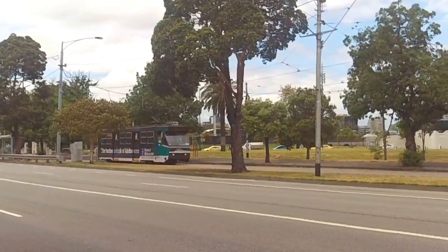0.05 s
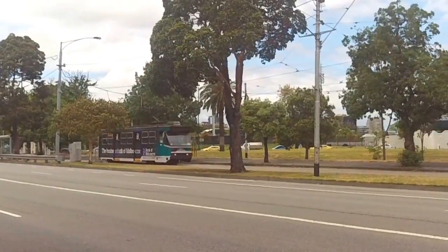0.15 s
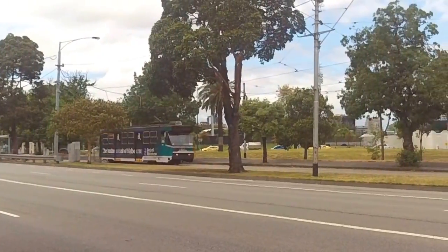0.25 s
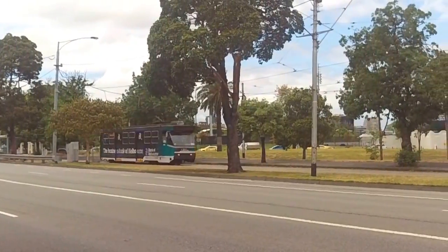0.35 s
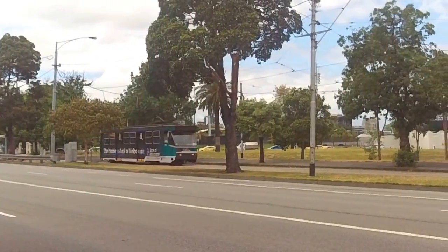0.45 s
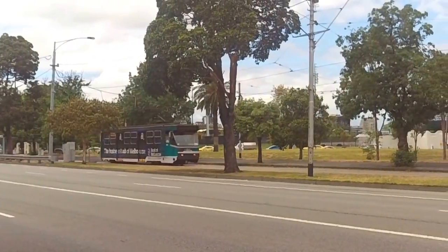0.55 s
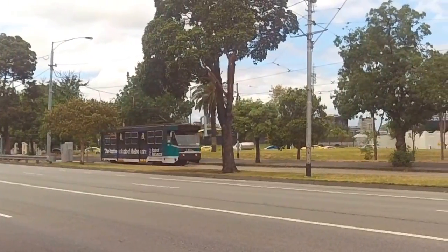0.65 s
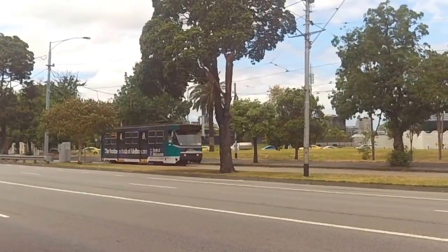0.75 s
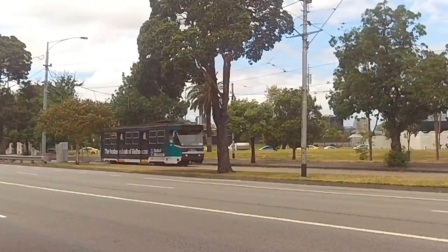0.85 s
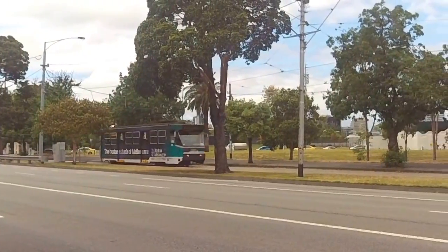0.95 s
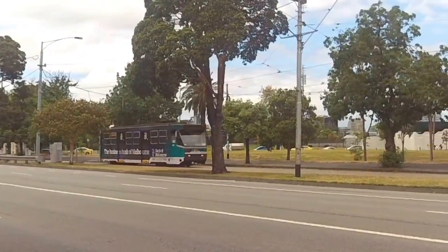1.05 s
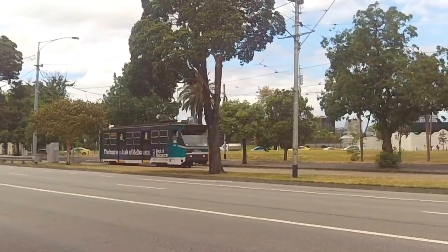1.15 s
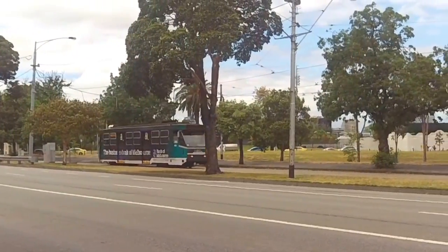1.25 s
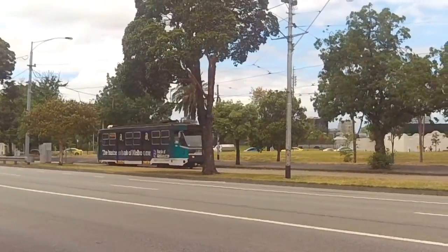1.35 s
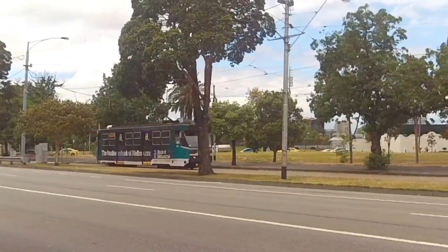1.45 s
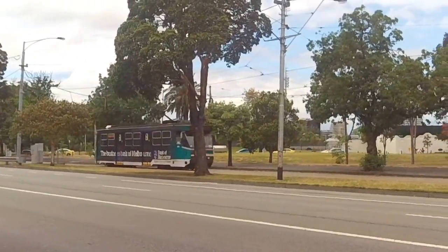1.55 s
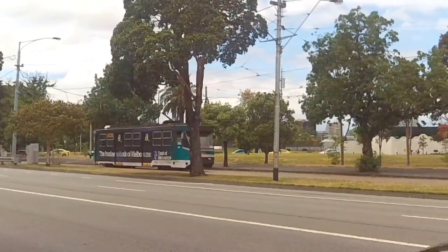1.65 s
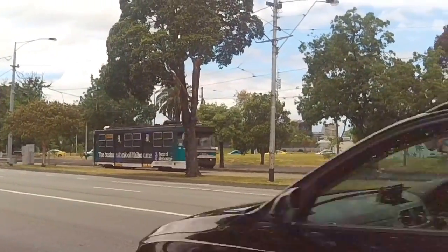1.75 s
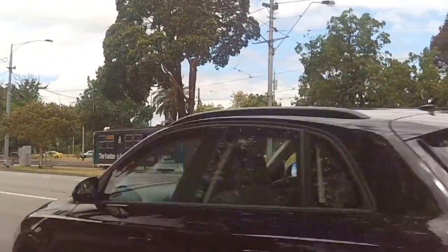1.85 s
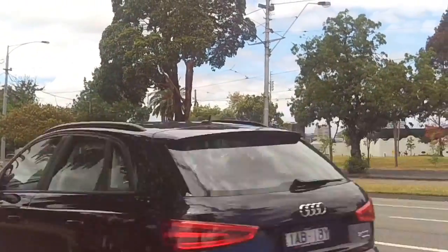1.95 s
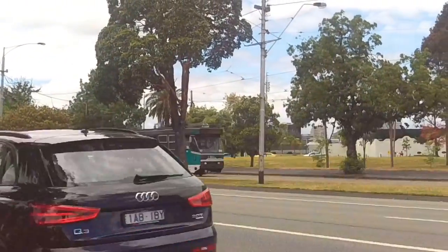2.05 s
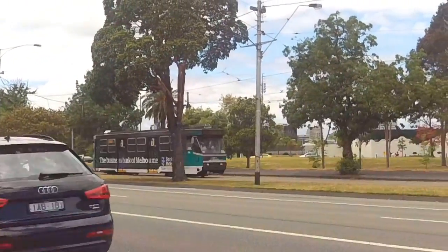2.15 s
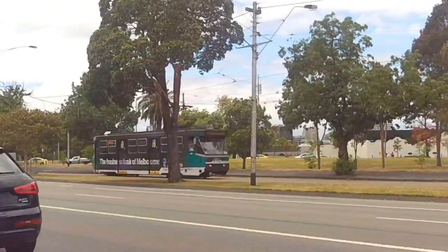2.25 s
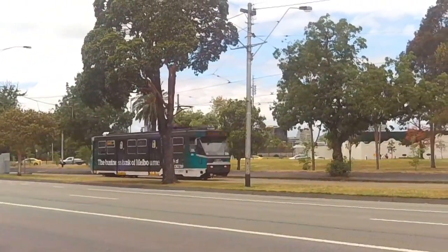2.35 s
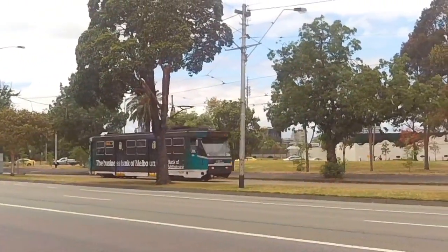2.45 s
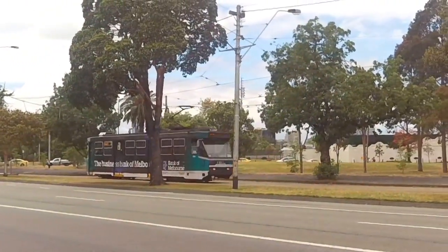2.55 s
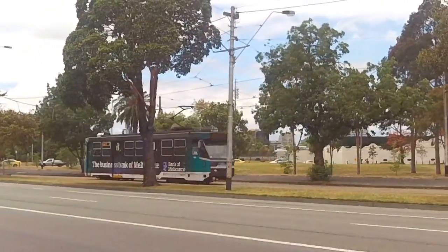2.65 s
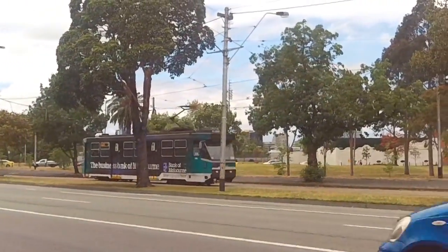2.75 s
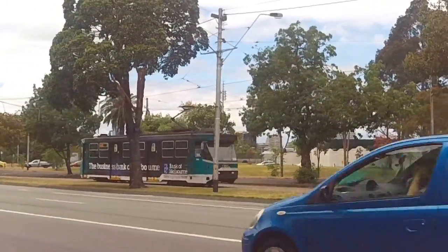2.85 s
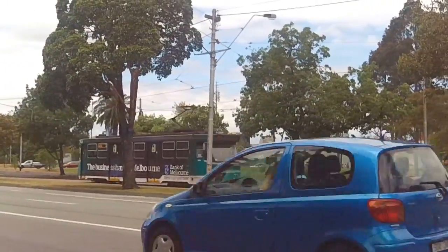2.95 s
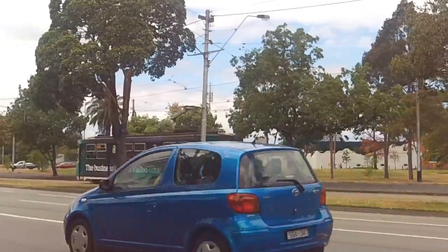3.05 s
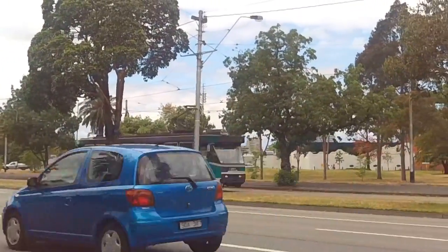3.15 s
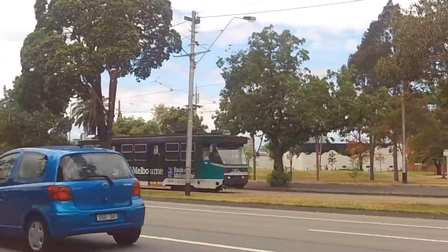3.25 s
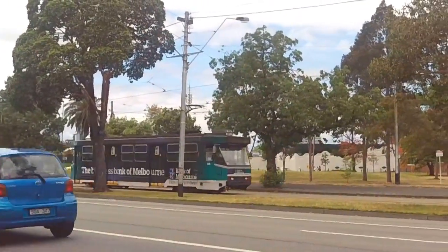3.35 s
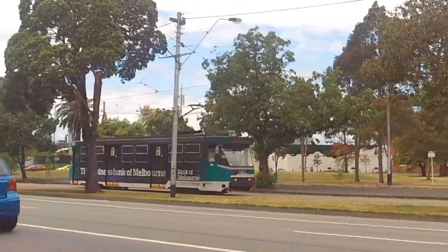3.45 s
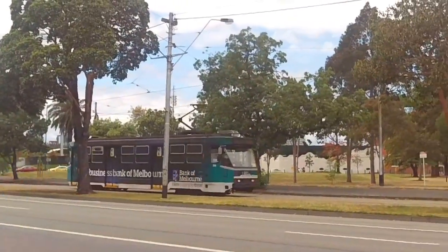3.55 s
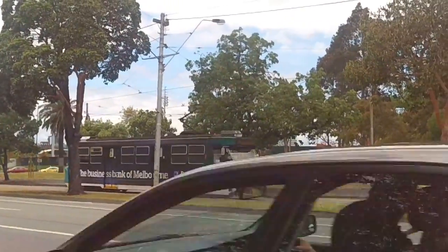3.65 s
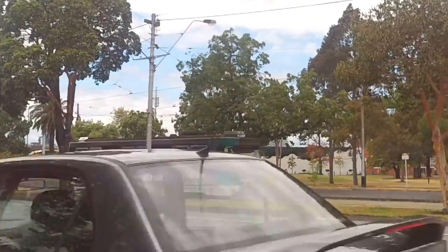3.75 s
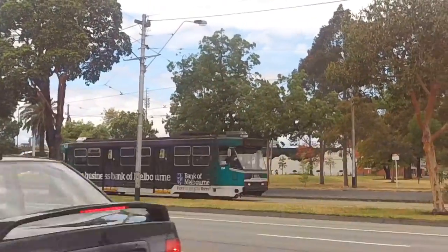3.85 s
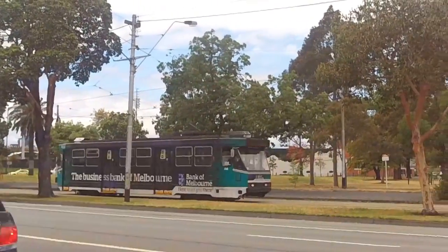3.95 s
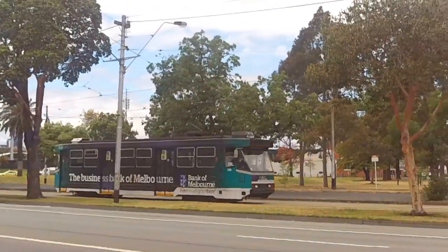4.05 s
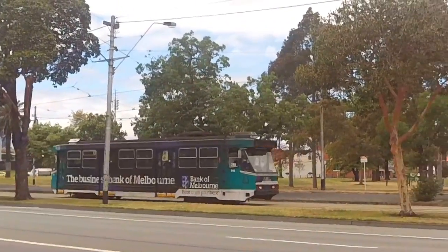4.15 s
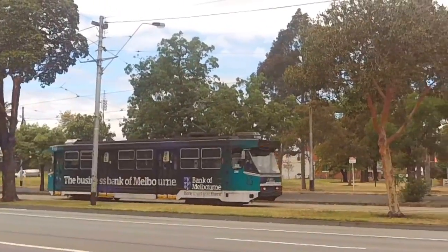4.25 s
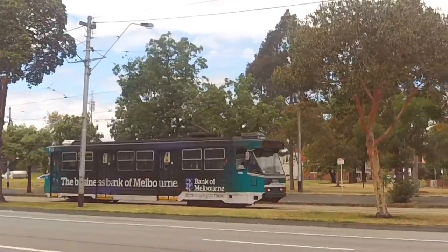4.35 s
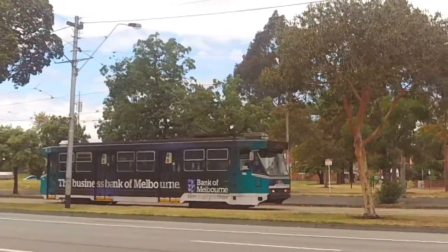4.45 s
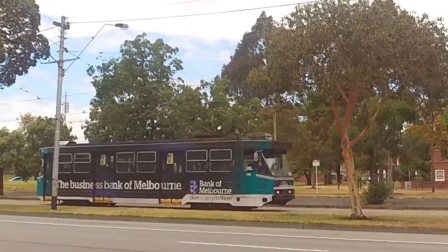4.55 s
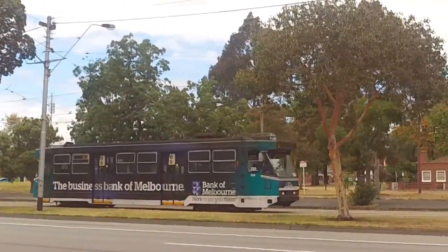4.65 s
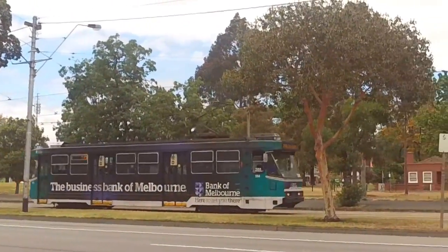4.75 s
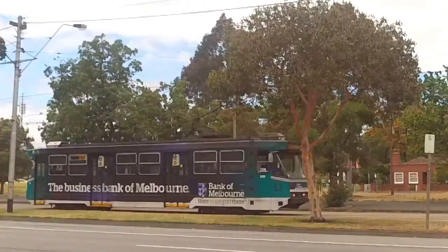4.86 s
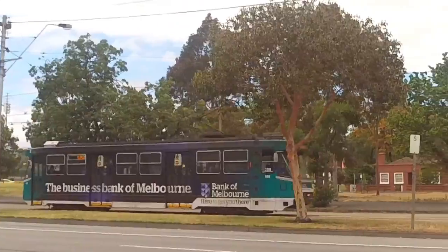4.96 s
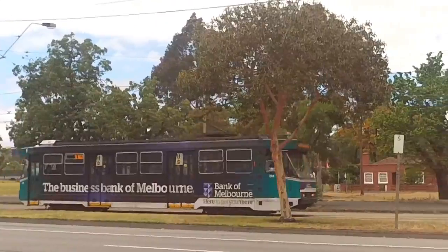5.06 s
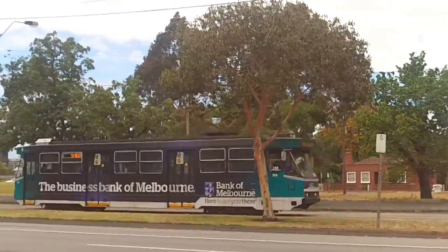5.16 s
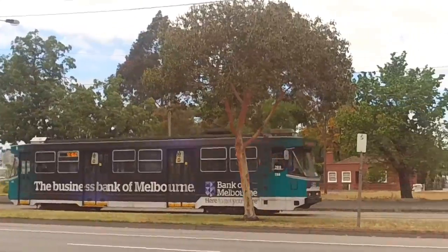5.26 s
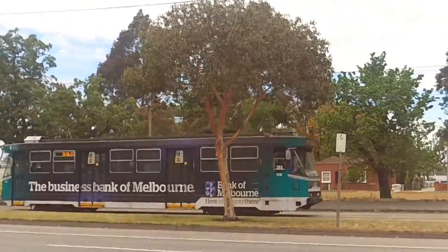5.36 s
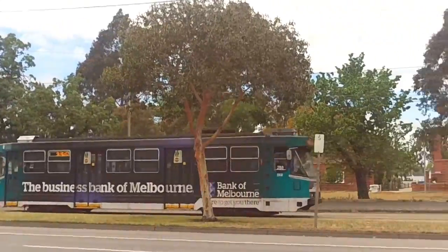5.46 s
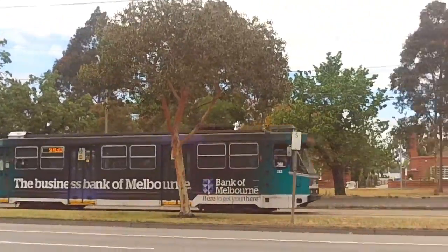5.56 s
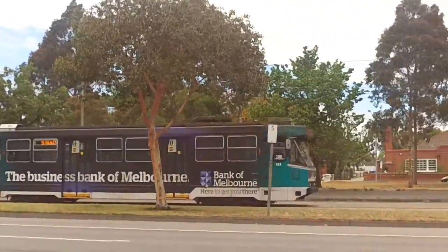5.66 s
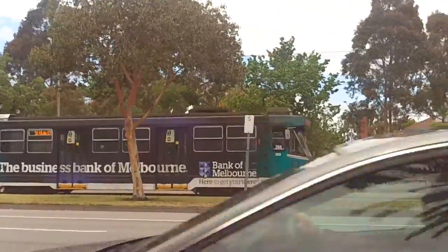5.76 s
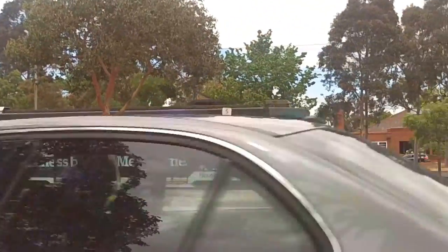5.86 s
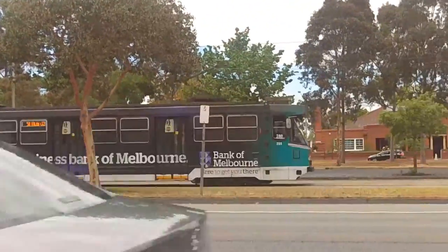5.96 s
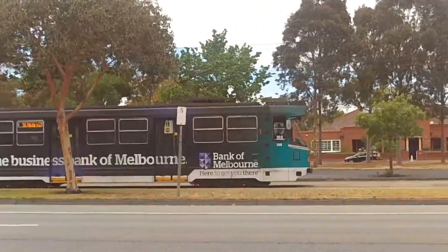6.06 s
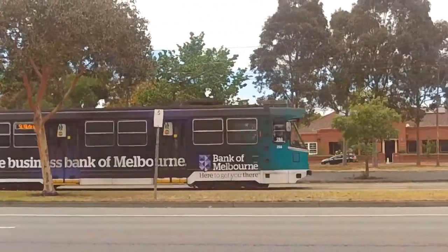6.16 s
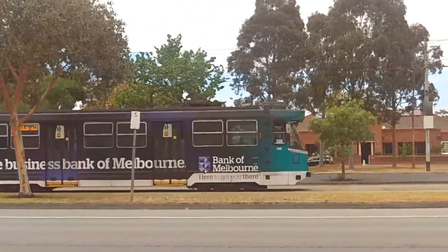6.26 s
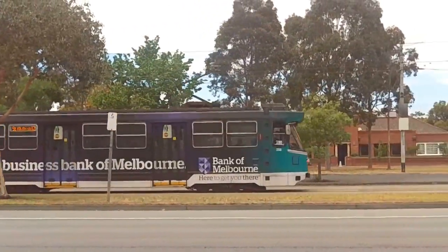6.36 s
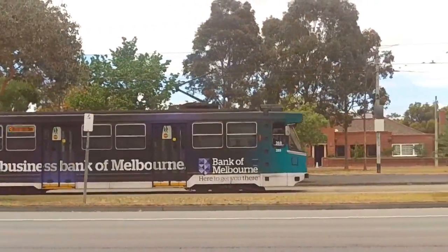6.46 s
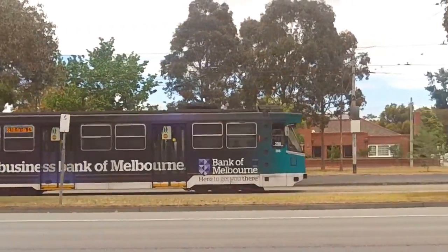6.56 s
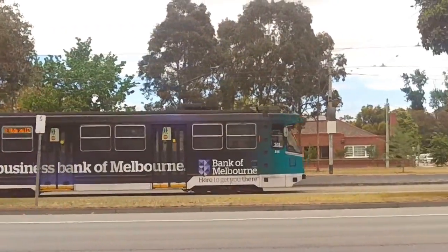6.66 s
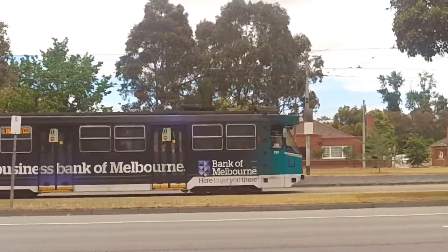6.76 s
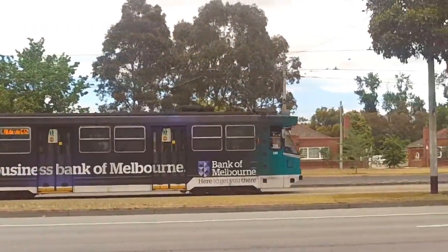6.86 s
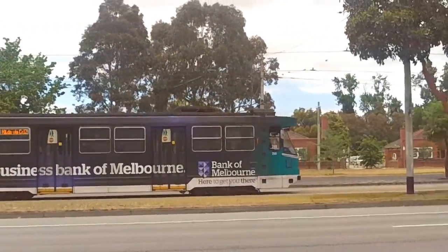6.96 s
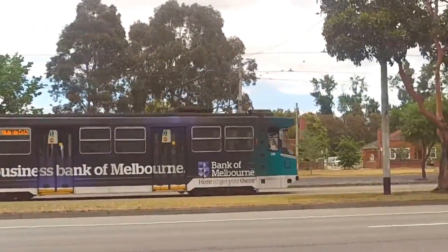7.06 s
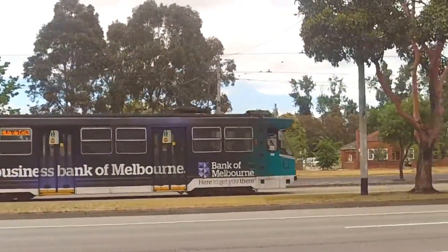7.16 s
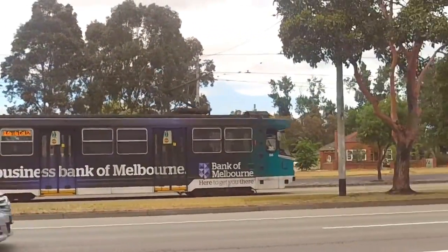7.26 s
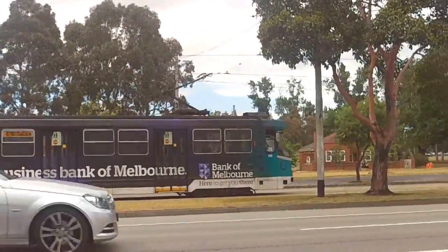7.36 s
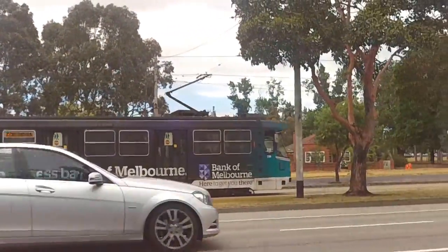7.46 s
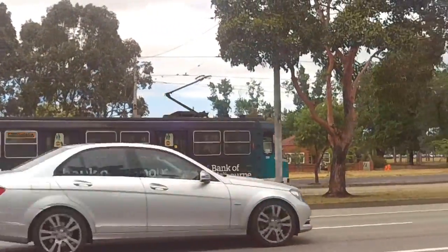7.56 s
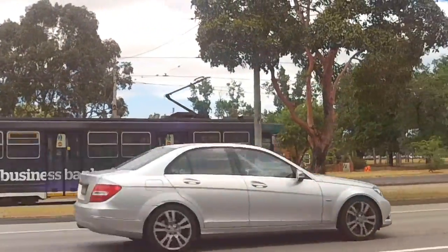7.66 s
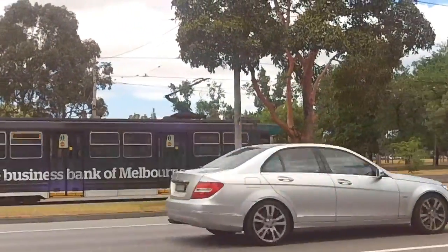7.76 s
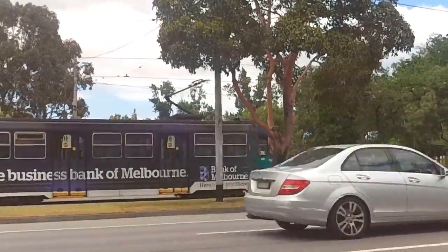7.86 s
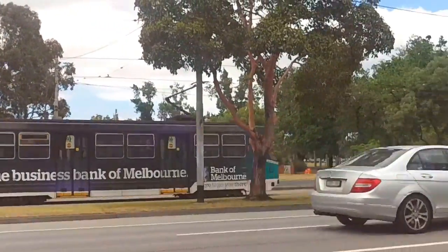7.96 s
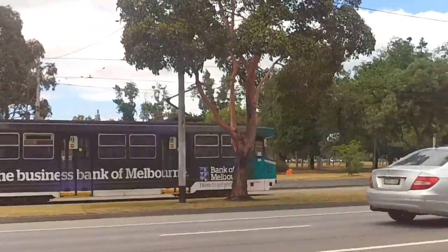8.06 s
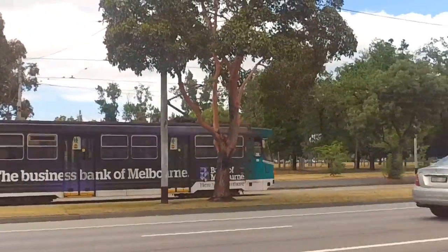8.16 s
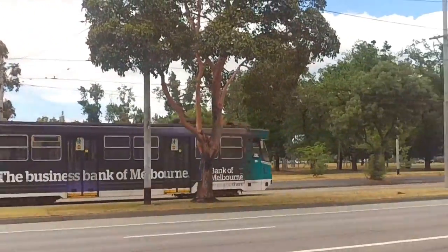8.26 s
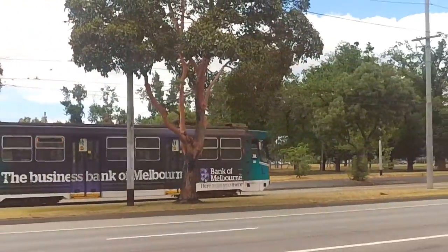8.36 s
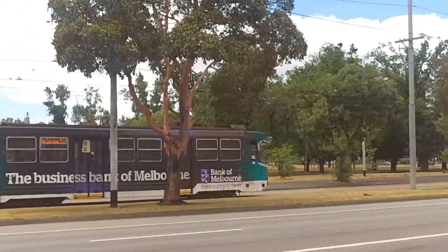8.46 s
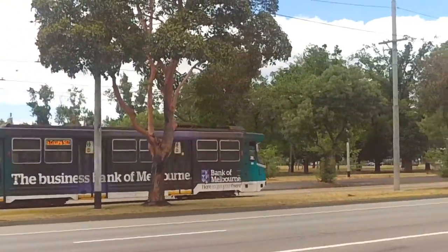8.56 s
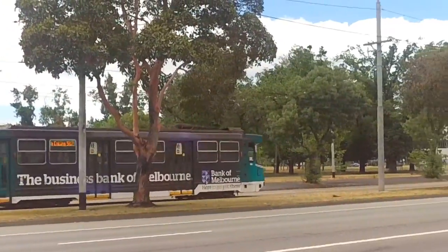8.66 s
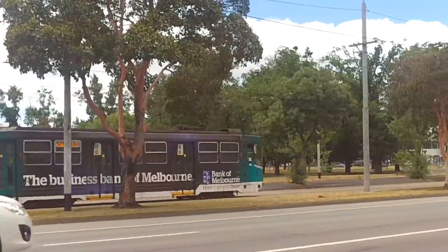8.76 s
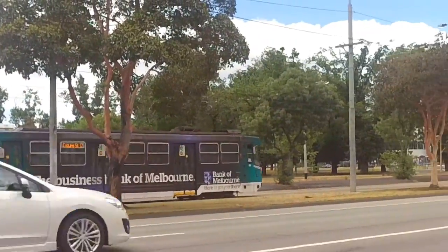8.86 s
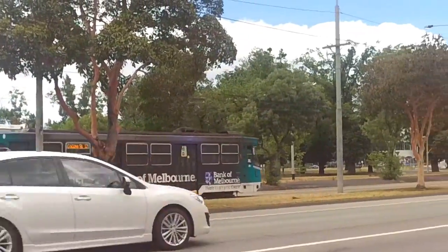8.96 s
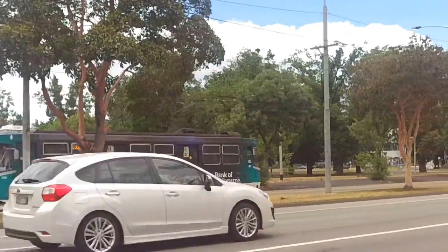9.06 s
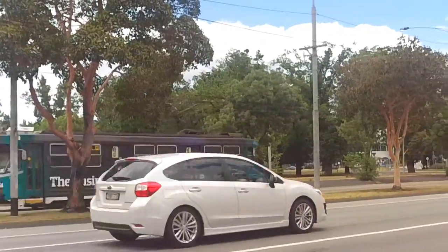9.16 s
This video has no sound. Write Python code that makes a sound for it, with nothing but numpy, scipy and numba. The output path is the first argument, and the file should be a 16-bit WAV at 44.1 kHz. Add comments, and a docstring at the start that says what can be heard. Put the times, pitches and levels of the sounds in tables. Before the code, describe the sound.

Open roadside, small stereo microphone at the kerb. It begins fairly quiet: distant traffic wash, a faint mid-low motor hum gone by about 1 second, a tiny bird twitter at 0.15 and a barely audible grit tick. Tyre roar climbs strongly from 1 second; a car passes left to right at about 2, another at 3.1, and a closer one at 3.75 with more engine rumble. The roar stays dense and fluttering, with hollow, sliding colours and airy hiss. A sharp little grit click comes at 4.6. The closest car sweeps past at 5.9, deep and broad, with a short wind thump at 5.8 that momentarily ducks the sound. Around 6.7 the rush is darker and smoother. Farther cars pass right to left at 7.7 and, faster, 9.05, with small wind bumps near 8 and thin high bird chirps from 8.1 to 8.7. It ends mid-rush.

```python
"""Cars roll past a few metres from a two-port microphone at the kerb; far traffic fills the gaps.
Each axle is noise read with its own lag at each port; bands of it make roar, tread, hiss, sizzle and rumble.
Slipstream puffs push the ports and make the gain control duck; grit ticks twice.
Behind: a small bird (gliding sines with tree echoes) and a distant motor (one sine)."""
import sys
import numpy as np
from scipy import signal
from scipy.fft import rfft, irfft, next_fast_len
from scipy.io import wavfile
from scipy.ndimage import uniform_filter1d
from numba import njit

SR = 44100
rng = np.random.default_rng(int(sys.argv[2]) if len(sys.argv) > 2 else 0)


def transcribe(signal):
    """Save signal, clipped to [-1, 1], as a 16-bit WAV file at the path in sys.argv[1]."""
    frames = np.atleast_2d(signal).T
    limited = np.clip(frames, -1, 1)
    pcm = np.round(limited * 32767).astype(np.int16)
    wavfile.write(sys.argv[1], SR, pcm)


N = 406161

# cars: t abreast/s, lane distance/m, speed toward right port/(m/s), relative strength/dB,
# extra hiss weight/dB, roar f/Hz, sizzle peak level/dB, engine peak over roar/dB
CAR_PASSES = [(1.95, 5.9, 12, 2, -5.5, 870, -48, -21.5), (3.101, 4.9, 10, 1, -9, 960, -39, -26),
              (3.75, 4, 11.5, 2.5, -8.5, 1106, -45, -15), (5.901, 2.53, 11.5, 3, -4, 973, -42, -10.5),
              (7.7, 8.8, -11.5, 2, 2, 978, -45.5, -23), (9.05, 7.6, -18, 1, -2, 1000, -48.5, -18.5)]
# far traffic: direction as a sine (-1 right, 1 left), relative strength/dB
FAR_STREAMS = [(-0.12, -23), (-1.07, -24), (0.94, -25.5), (-0.89, -20.5)]
WHEELBASE_M = 1.3


def sources(t):
    """Direction sine, gain and hiss gain per axle and far stream; axle gain falls as 1 / distance."""
    for abreast_s, lane_m, speed, db, hiss_db, *_ in CAR_PASSES:
        for axle in (-.5, .5):
            along_m = speed * (abreast_s - t) + axle * WHEELBASE_M
            r = np.hypot(along_m, lane_m)
            yield along_m / r, undb(db) / r, undb(db + hiss_db) / r
    for side, db in FAR_STREAMS:
        yield side + 0 * t, undb(db), undb(db)


def traffic(t, fine, order, port_lag_s, shade_db, airy):
    """Raw rush of all tyres at both ports: nearness sets each share, direction the lag and shading."""
    rush, power = np.zeros((2, N)), 0
    for k, (side, gain, hiss_gain) in enumerate(sources(t)):
        # each source and layer starts at its own place in the noise
        start = 1. * (3 * k + order) * (N // 60)
        lag = side * port_lag_s * SR / 2
        gain = hiss_gain if airy else gain
        shade = undb(side * shade_db / 2)
        left = shade * read(fine, start, -lag)
        right = read(fine, start, lag) / shade
        rush += gain * np.array([left, right])
        power = power + gain ** 2
    return rush / np.sqrt(power)


FAR_ROAR_HZ, FAR_SIZZLE_DB, FAR_ENGINE_DB = 940, -61, -24
# amplitude falls as distance ** -fall
SIZZLE_FALL, SIZZLE_LEAD_S, ENGINE_FALL, ENGINE_LEAD_S = 1.6, .08, 0.93, 0.16


def passing(t):
    """Power-weighted Doppler-shifted roar pitch; sizzle and engine gains peaking just before abreast."""
    weight = np.sum(undb(np.array(FAR_STREAMS)[:, 1]) ** 2)
    pitch = weight * FAR_ROAR_HZ
    sizzle, engine = undb(FAR_SIZZLE_DB) ** 2, undb(FAR_ENGINE_DB) ** 2
    for abreast_s, lane_m, speed, db, _, roar_hz, sizzle_db, engine_db in CAR_PASSES:
        r = np.hypot(speed * (abreast_s - t), lane_m)
        share = (undb(db) / r) ** 2
        doppler = 1 + speed ** 2 * (abreast_s - t) / r / 343
        weight = weight + share
        pitch = pitch + share * roar_hz * doppler

        def near(lead_s, fall):
            """Power against distance along the road, 1 at the peak."""
            return (1 + (speed * (abreast_s - lead_s - t) / lane_m) ** 2) ** -fall

        sizzle = sizzle + undb(sizzle_db) ** 2 * near(SIZZLE_LEAD_S, SIZZLE_FALL)
        engine = engine + undb(engine_db) ** 2 * near(ENGINE_LEAD_S, ENGINE_FALL)
    return pitch / weight, np.sqrt(sizzle), np.sqrt(engine)


# layer levels: t/s, roar level/dB, tread ring over roar/dB, hiss over roar/dB
ROAD_LEVELS = [(0, -29.5, -3.5, -18), (.25, -27.5, -5.5, -15), (.5, -25, -8.5, -19.5), (.7, -23, -10, -23),
               (.9, -22, -9.5, -23), (1.1, -17.5, -10.5, -24.5), (1.22, -18, -8.5, -23),
               (1.35, -17.5, -7, -21), (1.46, -14.5, -5.5, -23), (1.6, -12, -8.5, -22.5),
               (1.85, -12, -3, -15.5), (1.97, -17, -3, -20.5), (2.1, -16, -5, -19.5),
               (2.2, -15.5, -4.5, -15.5), (2.33, -16.5, -8, -16.5), (2.5, -13, -5.5, -13.5),
               (2.6, -17.5, -2.5, -13), (2.7, -15, -1, -9.5), (2.8, -17.5, -3.5, -9),
               (2.92, -18, -0.5, -10.5), (3.05, -17.5, -1, -12), (3.15, -18, -2.5, -16),
               (3.25, -17.5, -3, -18.5), (3.45, -15, -3, -23), (3.56, -16.5, -2.5, -21),
               (3.7, -17, -1.5, -17), (3.9, -19, -1, -18.5), (4.1, -18, -1.5, -14), (4.3, -17.5, 1, -15),
               (4.48, -19.5, 0, -17), (4.65, -19.5, 0, -19), (4.83, -18.5, -3.5, -20),
               (5.0, -17.5, -4, -21), (5.15, -15, -5, -21), (5.35, -12, -6, -18.5), (5.48, -17, -7, -19.5),
               (5.6, -14, -6.5, -18), (5.73, -15.5, -2.5, -18.5), (5.95, -15, -7.5, -25),
               (6.08, -13.5, -8, -24), (6.2, -13.5, -12, -26.5), (6.45, -14, -13, -26),
               (6.7, -12.5, -19.5, -27), (7.0, -13, -14.5, -23), (7.3, -14, -9, -18.5),
               (7.55, -15.5, -8.5, -18.5), (7.75, -14, -6.5, -18), (7.9, -15.5, -4.5, -21),
               (8.0, -15.5, -7, -23.5), (8.17, -13, -3.5, -19.5), (8.3, -16, -6.5, -20),
               (8.5, -16, -6.5, -15.5), (8.68, -16, -8.5, -17.5), (8.85, -16.5, -4, -15.5),
               (9.03, -16, -7.5, -16.5), (9.21, -15.5, -5, -14.5)]
# sizzle band centre: t/s, f/Hz
SIZZLE_CENTRE = [(0, 12300), (2.2, 12300), (2.45, 13600), (2.75, 12200), (8.0, 12300), (8.5, 13900),
                 (9.21, 12600)]
ROAR_WIDTH_HZ, TREAD_HZ, TREAD_WIDTH_HZ, SIZZLE_WIDTH_HZ = 633, 1968, 2000, 5800
HISS_HZ, HISS_WIDTH_HZ, RUMBLE_HZ, RUMBLE_WIDTH_HZ = 5370, 10300, 308, 590
SIZZLE_PER_HISS = 0.35  # dB per dB
# lag between ports and level left over right, source fully at the left
LOW_LAG_S, MID_LAG_S, HIGH_LAG_S = 3.2e-5, 4.5e-5, 5.5e-5
LOW_SHADE_DB, MID_SHADE_DB, HIGH_SHADE_DB = -1, -1, -0.8


def road(t):
    """Tyre horn roar, tread ring, air hiss, sizzle and engine rumble; rough asphalt makes levels flutter."""
    roar_db, tread_over, hiss_over = curves(t, ROAD_LEVELS)
    roar_hz, sizzle_gain, engine_gain = passing(t)
    tread_db, hiss_db = roar_db + tread_over, roar_db + hiss_over
    size = next_fast_len(2 * N)
    fine = signal.resample(rng.standard_normal(size), 4 * size)
    horn = traffic(t, fine, order=1, port_lag_s=LOW_LAG_S, shade_db=LOW_SHADE_DB, airy=False)
    blocks = traffic(t, fine, order=2, port_lag_s=MID_LAG_S, shade_db=MID_SHADE_DB, airy=False)
    air = traffic(t, fine, order=3, port_lag_s=HIGH_LAG_S, shade_db=HIGH_SHADE_DB, airy=True)
    patchy = walk(8)

    roar_gain = undb(roar_db + 0.36 * patchy + 0.7 * walk(30))
    roar = roar_gain * unit(band(horn, roar_hz, ROAR_WIDTH_HZ))

    tread_gain = undb(tread_db + 0.49 * patchy + 0.5 * walk(16))
    tread = tread_gain * unit(band(blocks, TREAD_HZ, TREAD_WIDTH_HZ))

    hiss_gain = undb(hiss_db + 0.46 * patchy + 0.99 * walk(18))
    hiss = hiss_gain * unit(band(air, HISS_HZ, HISS_WIDTH_HZ))

    sizzle_hz, = curves(t, SIZZLE_CENTRE)
    sizzle_db = SIZZLE_PER_HISS * (hiss_over - hiss_over.mean()) + .6 * patchy + .9 * walk(18)
    sizzle = sizzle_gain * undb(sizzle_db) * unit(band(blocks, sizzle_hz, SIZZLE_WIDTH_HZ))
    sizzle = sizzle * undb([[0.7], [-0.7]])  # left, right

    rumble_gain = engine_gain * undb(roar_db + 1.25 * walk(7))
    rumble = rumble_gain * unit(band(air, RUMBLE_HZ, RUMBLE_WIDTH_HZ))
    return glide(roar + tread + hiss + rumble + scatter(t, roar_db) + sizzle, t)


SCATTER_HZ, SCATTER_WIDTH_HZ, SCATTER_OVER_ROAR_DB = 2000, 2000, -20.5
TRAM_ABREAST_S, TRAM_SPAN_S, TRAM_ECHO_DB = 6.7, .8, 4


def scatter(t, roar_db):
    """Tyre noise from all sides, unrelated at the ports; the flank of a passing tram throws back more."""
    tram_db = TRAM_ECHO_DB * np.exp(-((t - TRAM_ABREAST_S) / TRAM_SPAN_S) ** 2)
    diffuse = band(rng.standard_normal((2, N)), SCATTER_HZ, SCATTER_WIDTH_HZ)
    return undb(roar_db + SCATTER_OVER_ROAR_DB + tram_db) * unit(diffuse)


# peaks and hollows in the rush: t/s (negative: from the end), length/s, start f/Hz, end f/Hz,
# width/Hz, centre gain/dB
GLIDE_BANDS = [(0.25, 1.83, 910, 720, 170, 3.5), (0.5, 1.1, 520, 580, 201, -3),
               (0, 1.56, 1460, 1000, 330, -9), (0.18, 1.46, 1730, 1580, 380, 5.5),
               (2.04, 0.34, 1750, 2000, 230, 4), (2.5, 1.3, 516, 360, 170, -2.5),
               (4.5, 1.05, 2070, 2200, 260, 3), (3.5, 1.03, 2230, 2450, 290, -14.5),
               (4.5, 0.72, 2650, 2870, 200, 4), (5, 0.72, 1260, 690, 210, 6),
               (5.5, 2.7, 1400, 1630, 400, -6.5), (6, 1.17, 568, 524, 146, -10),
               (7, 2.28, 2290, 2530, 360, -5), (8.3, 0.96, 3700, 3700, 1000, 3),
               (2.5, 0.56, 580, 620, 130, 4), (3, 0.66, 510, 500, 170, 3.5), (3.5, 0.7, 2300, 2600, 590, 4),
               (2.5, .5, 1700, 2000, 170, -3), (5.5, 0.24, 1450, 1500, 220, 2),
               (6.5, 0.47, 2700, 2300, 410, -2), (2.5, 0.59, 3700, 3620, 450, 3),
               (1, .4, 3100, 2800, 500, -3.5), (-0.4, 0.34, 2500, 2400, 350, -3),
               (8, .65, 2100, 1950, 280, -1), (6.0, .5, 1250, 1160, 250, 3.5),
               (5.0, 0.66, 440, 420, 130, 3.5), (0.2, .8, 3300, 2800, 500, -1.5),
               (3, .62, 3600, 4800, 2500, 1), (3.5, 1.1, 3600, 3800, 1000, -2),
               (8.2, 1.1, 4700, 4500, 1400, 3), (3.7, 0.42, 2000, 1980, 230, 4),
               (1.2, .25, 850, 830, 250, 1.5), (1.8, 0.46, 750, 690, 140, -1),
               (4, 1.03, 560, 570, 130, -3.5), (8, 1.2, 220, 230, 75, 5), (6.0, .9, 320, 300, 120, 2.5),
               (5.0, 2.1, 170, 180, 70, -5.5), (1.1, 0.7, 320, 350, 90, -4), (7.5, 0.87, 370, 360, 90, -5),
               (6, .6, 2200, 2500, 400, -2), (0.5, 0.25, 15000, 19000, 3300, 3.5),
               (3.5, .25, 14000, 14000, 5000, -2.5), (3.5, .75, 14000, 13000, 5000, -3),
               (5.38, .42, 13000, 14000, 5000, 3.5), (7, .18, 12800, 12800, 5000, -3),
               (8.1, 0.68, 13000, 16000, 5000, 3.5), (3.5, 0.44, 580, 690, 300, 3),
               (8, 0.92, 380, 340, 320, -2)]


def glide(x, t):
    """Lift or hollow narrow bands that fade in, slide and fade out."""
    out = x.copy()
    for s, length_s, start_hz, end_hz, width_hz, db in GLIDE_BANDS:
        a, b = int(s * SR), min(int((s + length_s) * SR), N)
        u = np.linspace(0, 1, b - a)
        depth = (undb(db) - 1) * np.minimum(2 * np.sin(np.pi * u), 1)
        centre_hz = start_hz + (end_hz - start_hz) * u
        for port in range(2):
            out[port, a:b] += depth * svf(x[port, a:b].copy(), centre_hz, 1. * width_hz)
    return out


# slipstream on the ports: t/s, half-length to 1/e /s, slow push level/dB, turbulence level/dB
SLIPSTREAM_PUFFS = [(3.18, 0.057, -28, -37), (5.752, 0.02, -32, -22.5), (5.789, 0.017, -1.5, -10.5),
                    (5.862, 0.02, -12, -26), (6.042, 0.019, -9.5, -35), (6.578, 0.0074, -9.5, -43),
                    (7.797, 0.0083, -7, -40), (8.056, 0.02, -10.5, -39)]
# steady turbulence: t/s, level/dB
BREEZE_LEVEL = [(0, -45), (.6, -47), (1.2, -57), (2.3, -53), (2.6, -46), (2.8, -50), (3.4, -57), (4.2, -51),
                (5.2, -59), (6.498, -51), (7.1, -44), (7.55, -42.5), (7.75, -43), (8.0, -38), (8.3, -41),
                (8.5, -37), (8.7, -44), (9.21, -44)]


def slipstream(t):
    """Slow pressure push per puff, over low turbulence mostly unrelated at the two ports."""
    push = 0
    gust = undb(curves(t, BREEZE_LEVEL)[0] + 3.0 * walk(9))
    for s, length_s, push_db, gust_db in SLIPSTREAM_PUFFS:
        shape = np.exp(-((t - s) / length_s) ** 2)
        push = push + undb(push_db) * shape
        gust = gust + undb(gust_db) * shape
    own = rng.standard_normal((2, N)) * np.array([[2.2], [1.5]])
    eddies = own + rng.standard_normal(N)  # second term common to both ports
    return push + gust * unit(band(eddies, 60, 210))


# grit flicked up by a tyre: t/s, centre f/Hz, level before the envelope/dB
GRIT_TICKS = [(0.27, 8000, -30), (4.607, 3600, -10)]


def grit(t):
    """Tiny clicks: sine bursts under a 0.3 ms Gaussian."""
    out = np.zeros(N)
    for s, hz, db in GRIT_TICKS:
        out += undb(db) * np.exp(-((t - s) / 0.0003) ** 2) * np.sin(2 * np.pi * hz * (t - s))
    return out


# bird notes: t/s, length/s, start f/Hz, end f/Hz, level before roughening/dB
BIRD_CHIRPS = [(0.14, .025, 4900, 5800, -45), (0.155, .025, 5300, 5000, -48), (0.162, .02, 6050, 6150, -49),
               (0.18, 0.045, 5150, 5600, -47), (0.207, .03, 6200, 6050, -49), (8.085, .03, 5900, 6700, -37),
               (8.374, .05, 6500, 6900, -43), (8.447, 0.03, 6500, 7000, -37), (8.535, .04, 7000, 6200, -40),
               (8.605, 0.04, 6600, 6800, -38), (8.705, .03, 6500, 6300, -39)]
TREE_ECHO_T60_S, TREE_ECHO_DB = .5, 1  # echo energy over direct


def bird(t):
    """Short gliding whistles, randomly roughened, smeared by decaying-noise echoes from the trees."""
    whistle, husk = np.zeros(N), 1 + 1.2 * walk(1200)
    for s, length_s, start_hz, end_hz, db in BIRD_CHIRPS:
        u = np.clip((t - s) / length_s, 0, 1)
        phase = 2 * np.pi * length_s * (start_hz * u + (end_hz - start_hz) * u ** 2 / 2)
        whistle += undb(db) * np.sin(np.pi * u) * np.sin(phase)
    late = t[:SR // 3]
    echo = rng.standard_normal((2, len(late))) * undb(-60 * late / TREE_ECHO_T60_S)
    echo *= undb(TREE_ECHO_DB) / np.sqrt(np.sum(echo ** 2, axis=1, keepdims=True))
    rough = whistle * husk
    return rough + signal.fftconvolve(rough[None], echo, axes=1)[:, :N]


# distant motor: t/s, f/Hz, level/dB
MOTOR_HUM = [(0, 506, -45), (.68, 507, -46.5), (.78, 508, -58), (1.0, 505, -86)]


def motor_hum(t):
    """Distant motor: one sine of drifting pitch and unsteady level."""
    hum_hz, hum_db = curves(t, MOTOR_HUM)
    return undb(hum_db + .6 * walk(25)) * np.sin(2 * np.pi * np.cumsum(hum_hz) / SR)


def undb(db):
    """Amplitude from dB."""
    return 10 ** (np.asarray(db) / 20)


def unit(x):
    """Scale to RMS 1."""
    return x / np.sqrt(np.mean(x ** 2))


def curves(t, table):
    """Interpolate each column of a table over its time column."""
    s, *columns = np.transpose(table)
    return [np.interp(t, s, c) for c in columns]


@njit
def svf(x, hz, width):
    """State-variable band-pass with a moving centre, gain 1 there."""
    y, b, l, g, k = np.empty(len(x)), 0., 0., 0., 0.
    for i in range(len(x)):
        if i % 16 == 0:
            g, k = np.tan(np.pi * hz[i] / SR), width / hz[i]
        v = (b + g * (x[i] - l)) / (1 + g * (g + k))
        b, l, y[i] = 2 * v - b, l + 2 * g * v, k * v
    return y


def band(x, hz, width):
    """A resonance applied twice to each channel."""
    hz = hz * np.ones(N)
    return np.array([svf(svf(c, hz, 1. * width), hz, 1. * width) for c in x])


@njit
def read(fine, start, lag):
    """Read four-times oversampled noise, late by a moving number of samples."""
    y = np.empty(len(lag))
    for i in range(len(lag)):
        p = 4 * (start + i - lag[i])
        j = int(p)
        y[i] = fine[j] + (p - j) * (fine[j + 1] - fine[j])
    return y


@njit
def follow(x, attack, release):
    """Envelope that rises fast and falls slowly."""
    y, e = np.empty(len(x)), 0.
    for i in range(len(x)):
        e += (x[i] - e) * (attack if x[i] > e else release)
        y[i] = e
    return y


def walk(rate_hz):
    """Random levels held 1 / rate_hz s and slewed twice; spread near 1."""
    k = int(SR / rate_hz)
    held = np.repeat(rng.standard_normal(N // k + 1), k)
    return 1.91 * uniform_filter1d(uniform_filter1d(held, k), k)[:N]


def scene():
    """Road, slipstream, grit, bird and motor summed at the two ports."""
    t = np.arange(N) / SR
    return road(t) + slipstream(t) + grit(t) + bird(t) + motor_hum(t)


# microphone and housing response: f/Hz, level/dB
MIC_RESPONSE = [(25, -47.5), (60, -26), (150, -17.5), (300, -3.5), (600, 0.5), (3200, -4), (3900, -6.5),
                (6000, -3.5), (8000, -6), (9300, -15.5), (9800, -36.5), (10050, -61), (10400, -19),
                (11200, -5), (12500, -2), (15000, -6.5)]
# port cavity resonances, left then right: f/Hz, width/Hz, share added
PORT_CAVITIES = [(1740, 680, 0.68), (1160, 180, 0.41)]
DUCK_THRESHOLD_DB, DUCK_ATTACK_S, DUCK_RELEASE_S = -8.5, 0.0011, 0.04
CEILING, LOW_CUT_HZ, TOP_HZ = 2, 45, 15170  # ceiling: amplitude where peaks round off


def record(dry):
    """Gain control ducks loud moments, bass included; then port and mic colour, soft ceiling, band limits."""
    loudest = np.abs(dry).max(axis=0)
    envelope = follow(loudest, 1 / (DUCK_ATTACK_S * SR), 1 / (DUCK_RELEASE_S * SR))
    held = dry / np.maximum(envelope / undb(DUCK_THRESHOLD_DB), 1)
    held = np.array([c + share * svf(c, hz * np.ones(N), 1. * width)
                     for c, (hz, width, share) in zip(held, PORT_CAVITIES)])
    size = next_fast_len(N + SR)
    mic_hz, mic_db = np.transpose(MIC_RESPONSE)
    bin_hz = np.arange(size // 2 + 1) * SR / size
    colour = undb(np.interp(np.log(bin_hz + 1), np.log(mic_hz), mic_db))
    coloured = irfft(rfft(held, size) * colour, size)[:, :N]
    out = CEILING * np.tanh(coloured / CEILING)
    out = signal.sosfilt(signal.butter(2, LOW_CUT_HZ, "high", fs=SR, output="sos"), out)
    return signal.sosfilt(signal.ellip(12, .2, 80, TOP_HZ, fs=SR, output="sos"), out)


dry = scene()
out = record(dry)
transcribe(out)
```